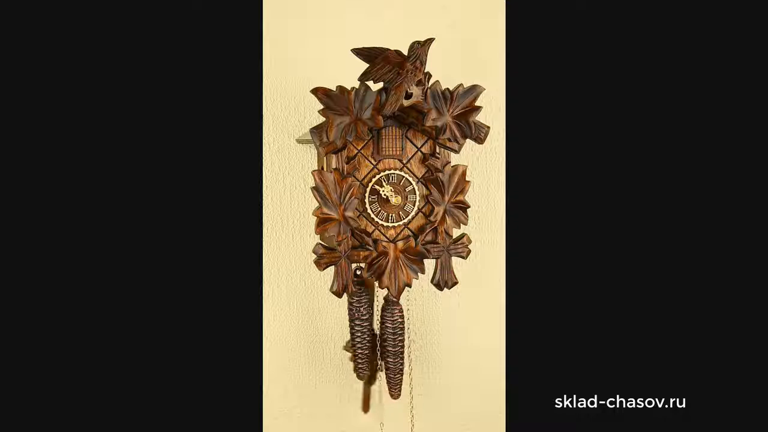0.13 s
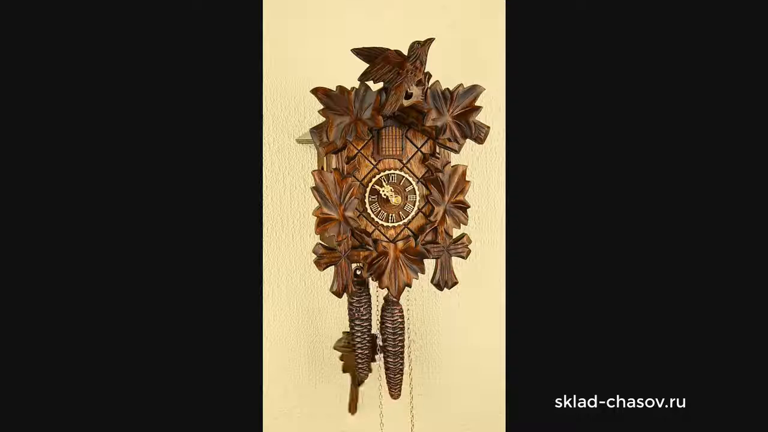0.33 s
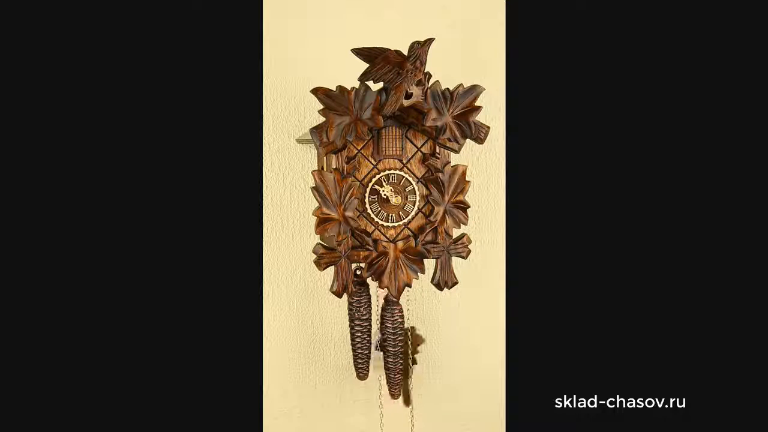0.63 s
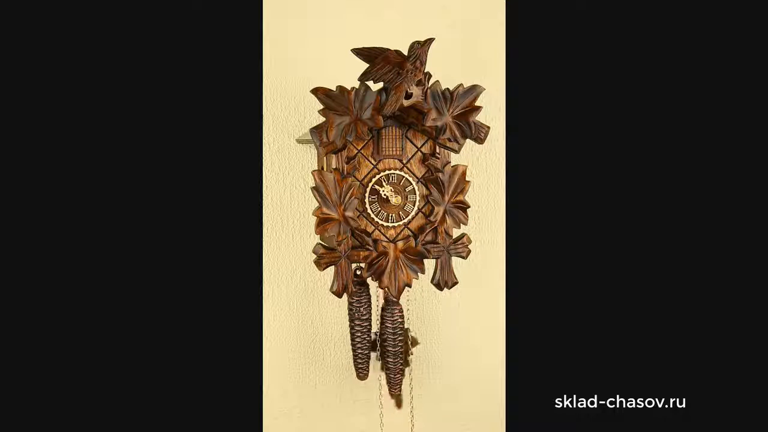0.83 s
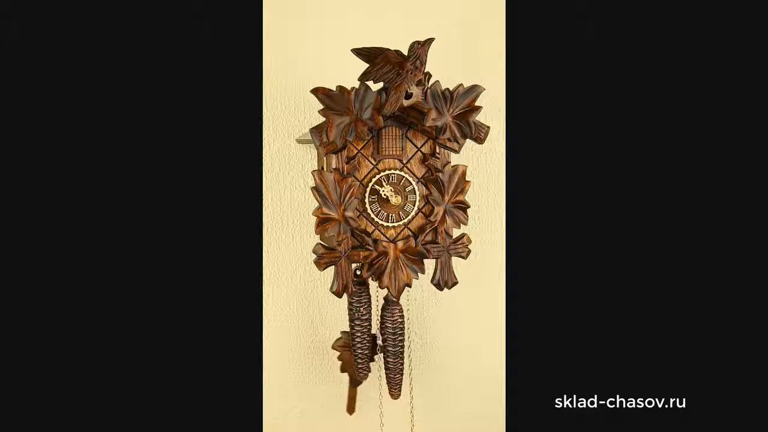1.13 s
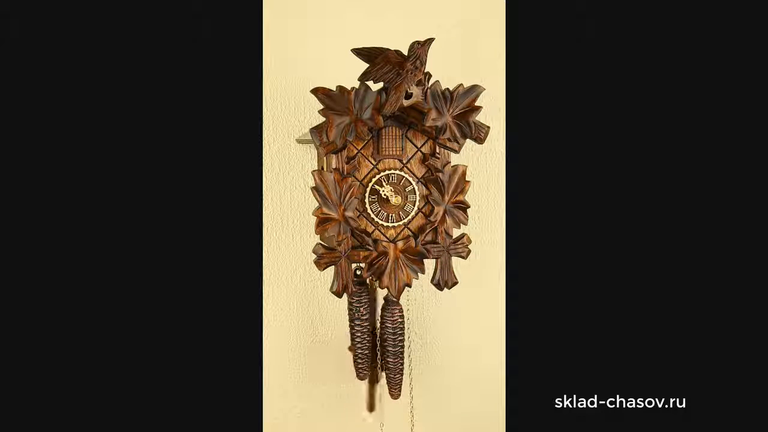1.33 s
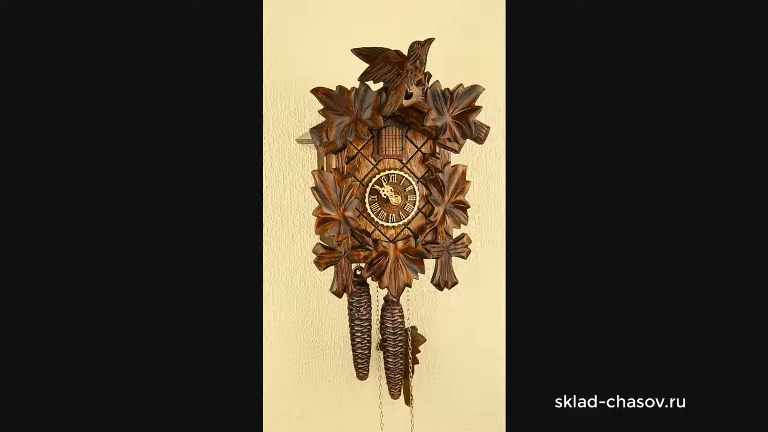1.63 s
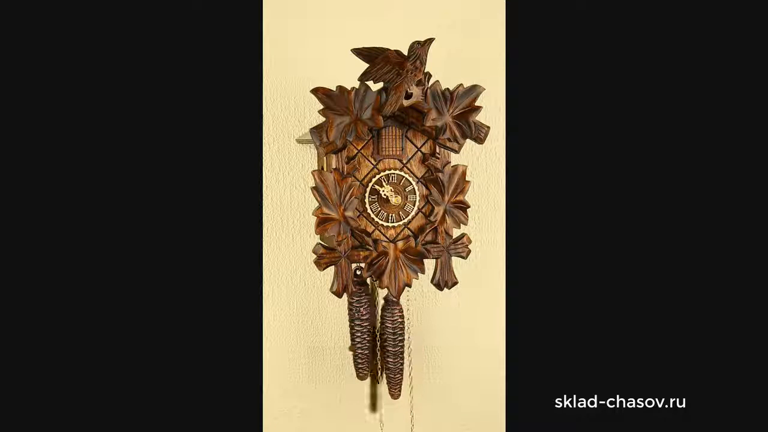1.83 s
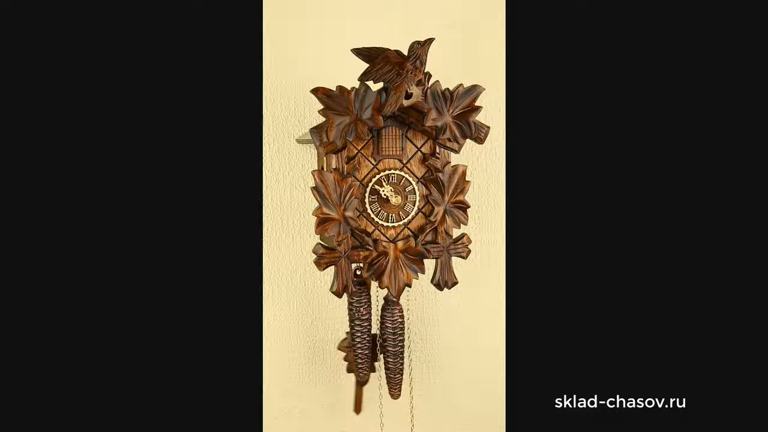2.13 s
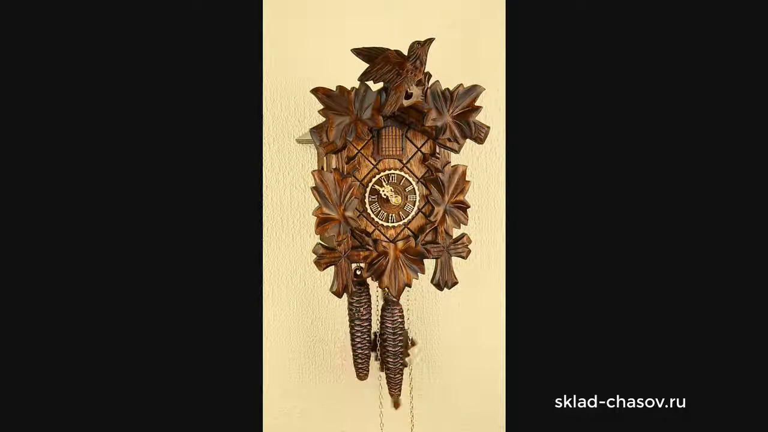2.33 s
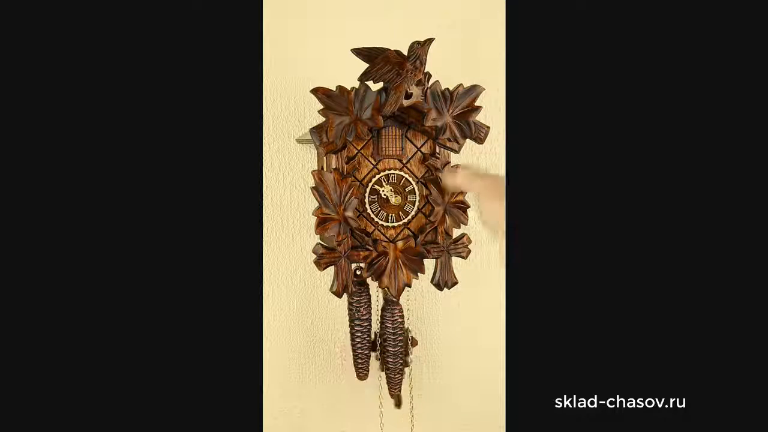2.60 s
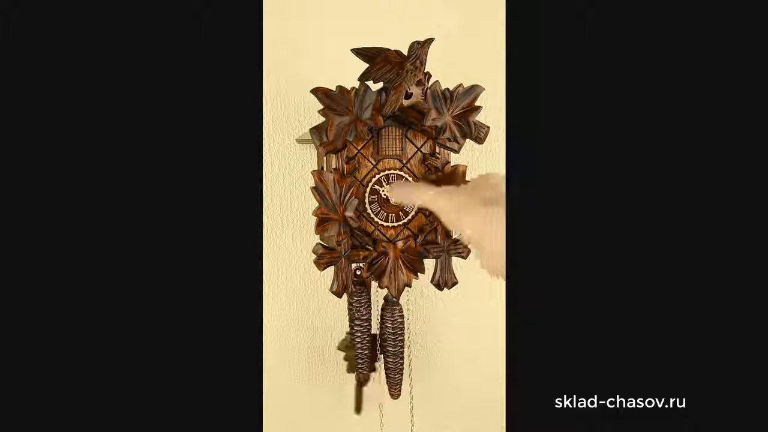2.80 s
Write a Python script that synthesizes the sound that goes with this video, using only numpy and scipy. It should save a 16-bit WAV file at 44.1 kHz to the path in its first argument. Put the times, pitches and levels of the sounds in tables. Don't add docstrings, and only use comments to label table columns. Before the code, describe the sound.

Steady mechanical clock ticking, six small bright clicks with a short room echo over faint hiss and hum, then light skin and sleeve rubbing as a finger turns the hand, with a barely audible thin squeak.

```python
import sys
import numpy as np
from scipy import signal
from scipy.fft import rfft, irfft
from scipy.io import wavfile
from scipy.ndimage import uniform_filter1d, map_coordinates

SR = 44100
rng = np.random.default_rng(int(sys.argv[2]) if len(sys.argv) > 2 else 0)


def volts_from_db(level):
    exponent = np.asarray(level, float) / 20
    return 10 ** exponent


def master_out(mix):
    frames = np.transpose(np.atleast_2d(mix))
    ceiling = np.clip(frames, -1, 1)
    pcm = np.round(ceiling * 32767).astype(np.int16)
    wavfile.write(sys.argv[1], SR, pcm)


N = 130536

# [t/s, peak level/dB]
LANDINGS = [
    (0.3313, -51.5),
    (0.7514, -48),
    (1.2092, -49),
    (1.6286, -50),
    (2.0863, -48),
    (2.506, -48),
]
# [delay t/s, level/dB]
CONTACTS = [
    (-.0002, 0),
    (.0024, -10),
    (.0034, -9),
    (.0062, -17),
    (.0122, -15),
    (.0200, -20),
]
# [tick level/dB, tock level/dB]
PLATE_LEVELS = [(-22.5, -16), (-16.5, -15.5), (-15.5, -22), (-16, -9), (-10.5, -7), (-5.5, -5.5), (-4, -6),
                (2, -3.5), (-0.5, -5), (-15.5, -14), (-20, -13.5), (-12, -12), (-25, -16), (-26, -15.5)]
PLATE_PITCHES = [2500, 2930, 3130, 4020, 4240, 4470, 5350, 5715, 6050, 7250, 7870, 8560, 9100, 10300]
PLATE_DECAYS = [.04, .03, .06, .025, .03, .022, .014, .018, .014, .025, .016, .025, .014, .014]
# [f/Hz, t/s]
ROOM_DECAY = [(2000, 0.72), (4500, 0.44), (7000, .18), (12000, 0.09)]
# [f/Hz, level/dB]
ROOM_COLOUR = [(2000, -1), (4500, 3), (5700, -5.5), (7500, 3), (11000, -10)]
# [t/s, f/Hz, level/dB]
SQUEAK = [
    (2.67, 11500, -105),
    (2.7, 12100, -84),
    (2.738, 11900, -85),
    (2.768, 12100, -83),
    (2.782, 12170, -104),
    (2.8, 12190, -81),
    (2.85, 11740, -82),
    (2.915, 12175, -80),
    (2.96, 11885, -82),
]
# [t/s, level/dB]
RUBBING = [
    (2.5, -100),
    (2.6, -75.5),
    (2.7, -72.5),
    (2.8, -73),
    (2.9, -72.5),
    (2.96, -74),
]
# [f/Hz, level/dB per Hz]
RUSTLE_COLOUR = [(250, 1), (500, 5.5), (2000, 6), (3500, 1), (5500, -6), (8000, -3.5), (10500, -0.5),
                 (15500, -17)]
# [f/Hz, level/dB per Hz]
AIR_COLOUR = [(88, -32), (150, -7), (199, -2), (232, -6.5), (424, -6), (488, -5), (832, -9), (1030, -8.5),
              (4300, -17), (5590, -36.5), (9460, -120)]
# [f/Hz, level/dB per Hz]
HISS_COLOUR = [(2650, -44), (4500, -30.5), (5450, -3.5), (6250, -6), (6840, -7), (8810, 2), (12300, 5),
               (15000, -1)]
# [f/Hz, level/dB per Hz]
DRIFT_COLOUR = [(1, -8), (4, -10), (12, -7), (20, -10.5), (35, -14), (80, -17.5), (130, -23.5), (170, -44)]
# [f/Hz, rms level/dB]
BUZZ_LINES = [(100, -87), (199, -89.5), (300, -88.5), (400, -88.5), (500, -85.5), (600, -95), (900, -91.5),
              (1479, -87.5)]

SINE_PEAK_DB = 3.01


def unit(x):
    return x / np.sqrt(np.mean(x ** 2) + 1e-20)


def along(points, hz):
    f, value = np.transpose(points)
    return np.interp(np.log(hz + 1), np.log(f + 1), value)


def curves(rows):
    s, *columns = np.transpose(rows)
    return [np.interp(np.arange(N) / SR, s, column) for column in columns]


def wobble(rate):
    points = rng.standard_normal(int(N * rate / SR) + 4)
    return map_coordinates(points, [np.arange(N) * rate / SR])


def rush(spectrum, patchy_db):
    z = signal.stft(rng.standard_normal(N + 1024), nperseg=512)[2]
    field = uniform_filter1d(rng.standard_normal(z.shape), size=6, axis=0)
    field = uniform_filter1d(field, size=14, axis=1)
    x = signal.istft(z * volts_from_db(patchy_db * unit(field)), nperseg=512)[1][:N]
    colour = volts_from_db(along(spectrum, np.fft.rfftfreq(N, 1 / SR)))
    return unit(irfft(rfft(x) * colour, N))


def contact(u, plate_db):
    rise_s, mode_vary_db, crack_db, crack_t60 = .0011, 1.5, -5, .02
    hz, t60 = np.array([PLATE_PITCHES, PLATE_DECAYS])[:, :, None]
    onset = 1 - np.exp(-u / rise_s)
    level = plate_db + mode_vary_db * rng.standard_normal(hz.shape)
    tones = volts_from_db(level - 60 * u / t60) * np.sin(2 * np.pi * hz * u)
    ring = tones.sum(axis=0) * onset
    crack = onset * volts_from_db(crack_db - 60 * u / crack_t60) * rng.standard_normal(len(u))
    band = signal.butter(2, (3120, 11900), "bandpass", fs=SR, output="sos")
    return ring + signal.sosfilt(band, crack)


def escapement():
    lead_s, delay_vary_s, hit_vary_db = .002, .0002, 1.5
    ring_db, room_db, blow_s = -2, -2.5, .0045
    out, t = np.zeros(N + SR), np.arange(SR // 2) / SR
    tick_db, tock_db = np.transpose(PLATE_LEVELS)[:, :, None]
    for k, (s, db) in enumerate(LANDINGS):
        plate_db = tock_db if k % 2 else tick_db
        beat = np.zeros(len(t))
        for delay, hit_db in CONTACTS:
            u = np.maximum(t - lead_s - delay - delay_vary_s * rng.normal(), 0)
            beat += volts_from_db(hit_db + hit_vary_db * rng.normal()) * contact(u, plate_db)
        beat *= volts_from_db(db + ring_db) / np.abs(beat).max()
        blow = beat * np.exp(-(t / blow_s) ** 4)
        start = round((s - lead_s) * SR)
        out[start:][:len(t)] += beat + volts_from_db(room_db) * walls(blow)
    return out[:N]


def walls(x):
    gap_s = .005
    hz, t, z = signal.stft(rng.standard_normal(SR // 2), SR, nperseg=256)
    fade_db = 60 * t / along(ROOM_DECAY, hz)[:, None]
    level = along(ROOM_COLOUR, hz)[:, None] - fade_db
    tail = signal.istft(z * volts_from_db(level), SR, nperseg=256)[1]
    delayed = np.pad(x, (round(gap_s * SR), 0))
    return signal.fftconvolve(delayed, tail / np.linalg.norm(tail))[:SR // 2]


def squeaking_bush():
    rough_db, jitter_hz = 1.5, 12
    hz, db = curves(SQUEAK)
    squeak = np.zeros(N)
    for share, drop in [(1, 0), (.905, -7)]:
        level = volts_from_db(db + SINE_PEAK_DB + drop + rough_db * wobble(76))
        pitch = share * hz + jitter_hz * wobble(150)
        squeak += level * np.sin(2 * np.pi * np.cumsum(pitch) / SR)
    return squeak


def fingertip():
    start_s, level_db, t60 = 2.596, -64, 0.029
    u = np.maximum(np.arange(N) / SR - start_s, 0)
    tap = (u > 0) * volts_from_db(level_db - 60 * u / t60) * rng.standard_normal(N)
    return signal.sosfilt(signal.butter(2, (8000, 13000), "bandpass", fs=SR, output="sos"), tap)


def turned_hand():
    rub_level = volts_from_db(curves(RUBBING)[0] + 0.5 * wobble(25.23))
    return squeaking_bush() + fingertip() + rub_level * rush(RUSTLE_COLOUR, patchy_db=-1.0)


def mains_buzz():
    sway_db, t = 1.5, np.arange(N) / SR
    buzz = np.zeros(N)
    for hz, db in BUZZ_LINES:
        level = volts_from_db(db + SINE_PEAK_DB + sway_db * wobble(4.78))
        buzz += level * np.sin(2 * np.pi * (hz * t + rng.random()))
    return buzz


def room_tone():
    air_db, air_sway_db, hiss_db, drift_db = -71.5, .4, -80, -69
    air = volts_from_db(air_db + air_sway_db * wobble(2.27)) * rush(AIR_COLOUR, patchy_db=1.06)
    hiss = volts_from_db(hiss_db) * rush(HISS_COLOUR, patchy_db=-1.5)
    drift = volts_from_db(drift_db) * rush(DRIFT_COLOUR, patchy_db=0.2)
    return air + hiss + drift + mains_buzz()


def scene():
    return (escapement() + turned_hand() + room_tone())[None]


def band_limit(x):
    return signal.sosfilt(signal.butter(12, 15200, fs=SR, output="sos"), x)


def record(dry):
    top_hz, offset = 15200, -.0033
    cut = irfft(rfft(dry) * (np.fft.rfftfreq(N, 1 / SR) < top_hz), N)
    return band_limit(cut + offset)


dry = scene()
out = record(dry)
master_out(out)
```